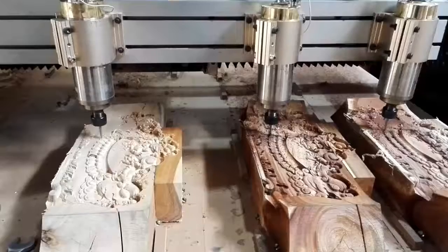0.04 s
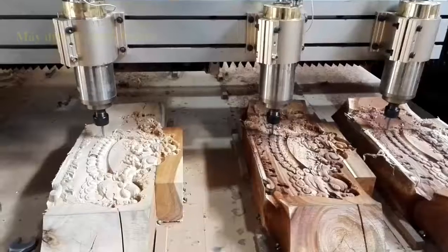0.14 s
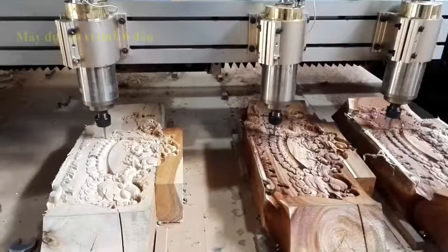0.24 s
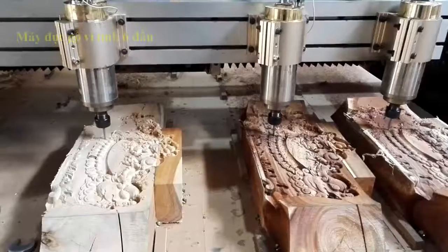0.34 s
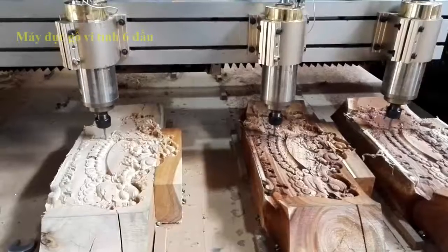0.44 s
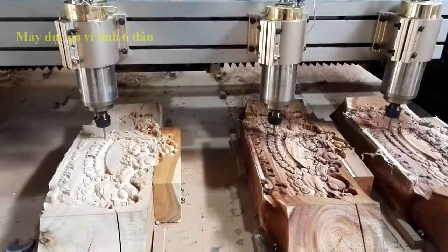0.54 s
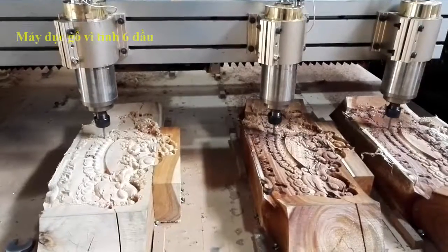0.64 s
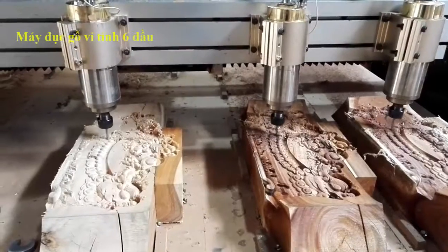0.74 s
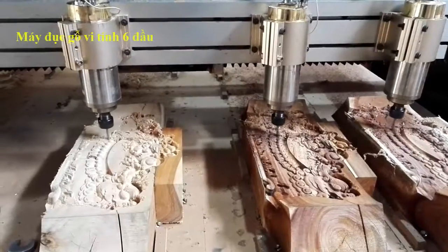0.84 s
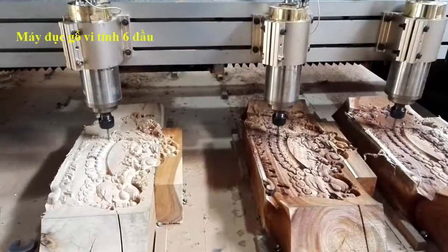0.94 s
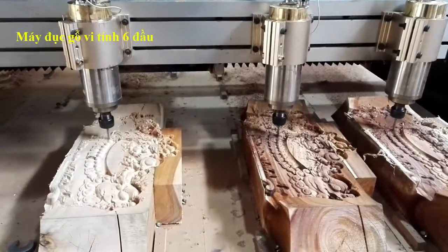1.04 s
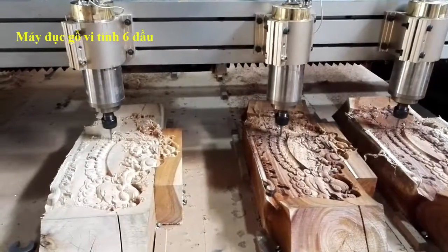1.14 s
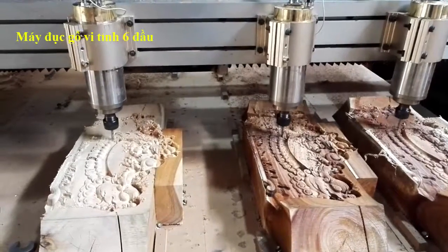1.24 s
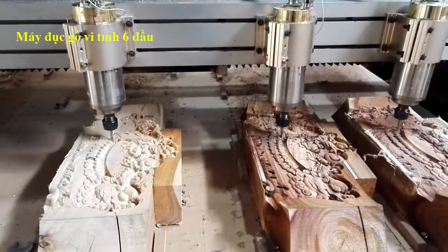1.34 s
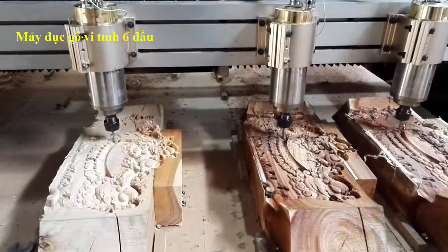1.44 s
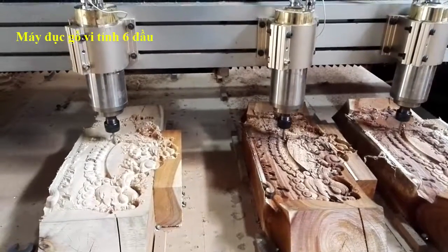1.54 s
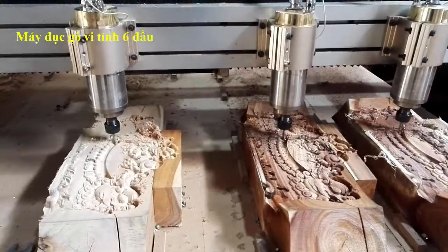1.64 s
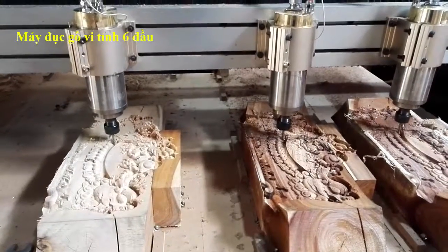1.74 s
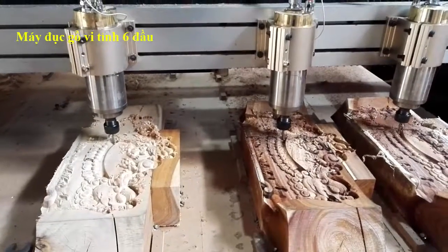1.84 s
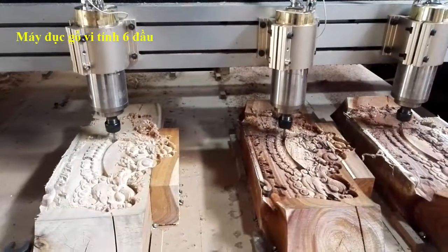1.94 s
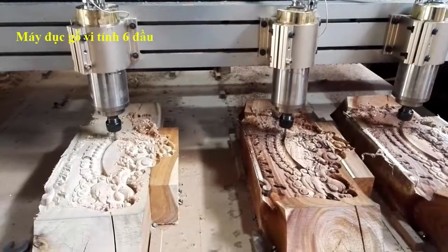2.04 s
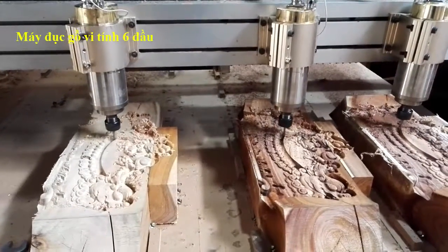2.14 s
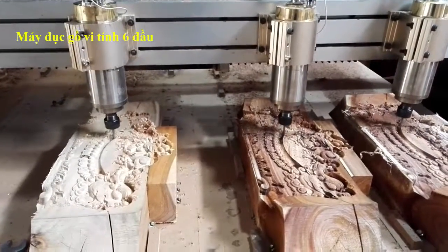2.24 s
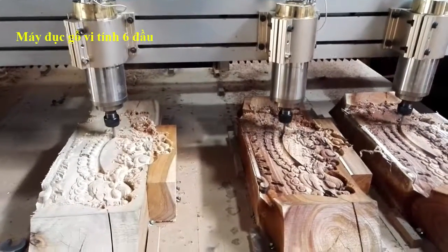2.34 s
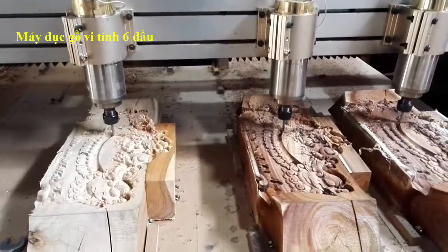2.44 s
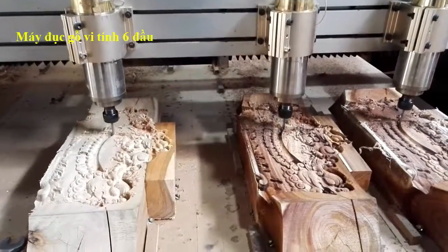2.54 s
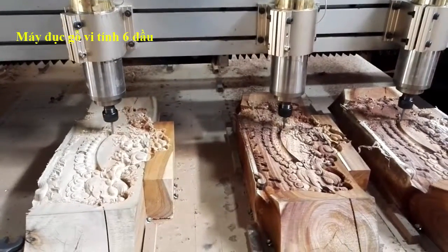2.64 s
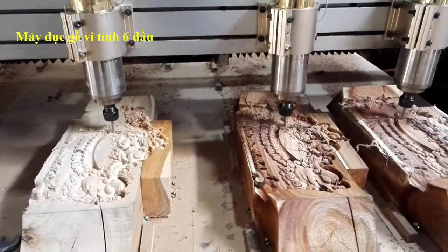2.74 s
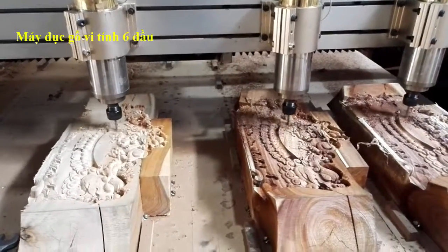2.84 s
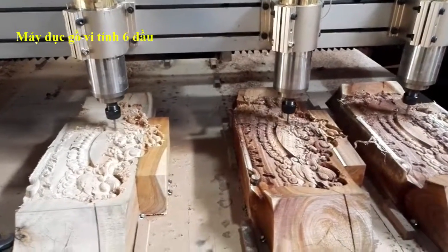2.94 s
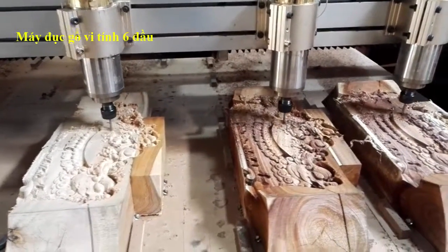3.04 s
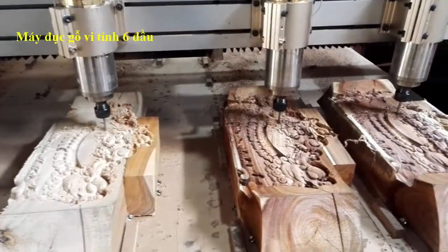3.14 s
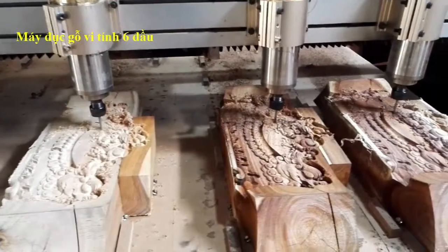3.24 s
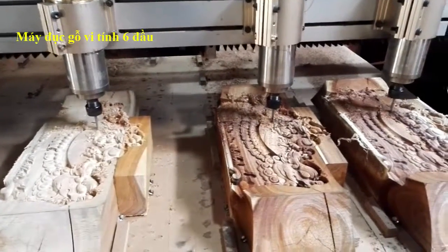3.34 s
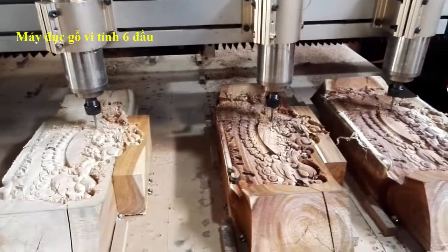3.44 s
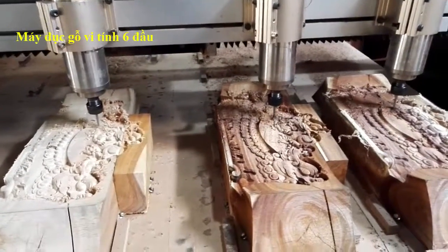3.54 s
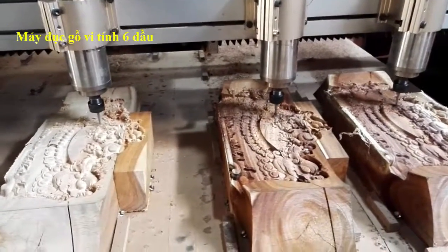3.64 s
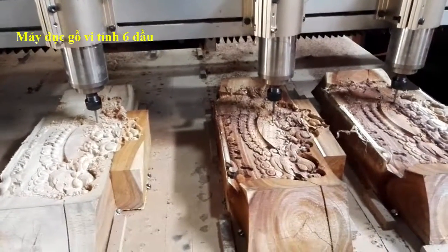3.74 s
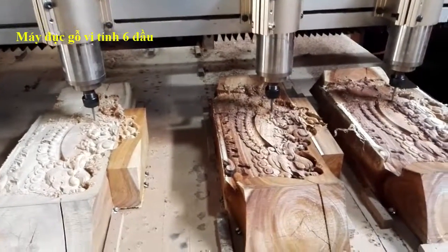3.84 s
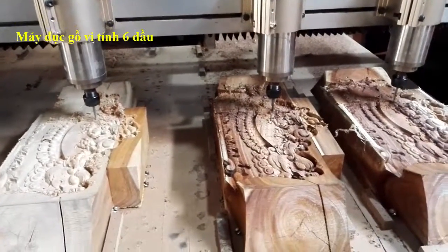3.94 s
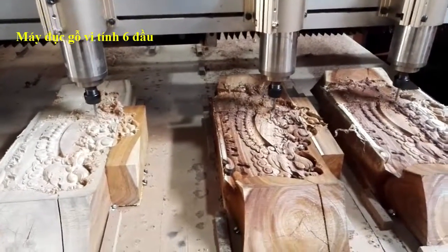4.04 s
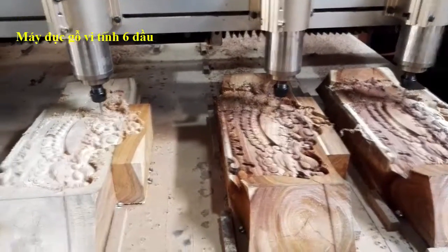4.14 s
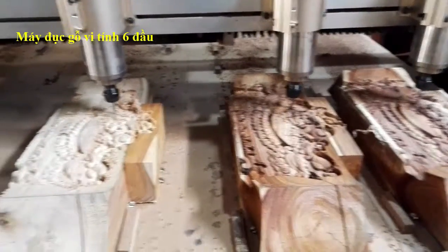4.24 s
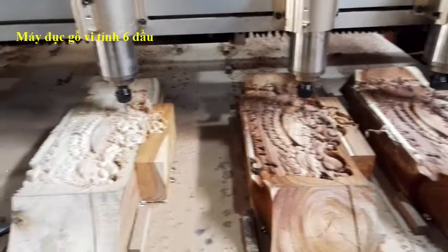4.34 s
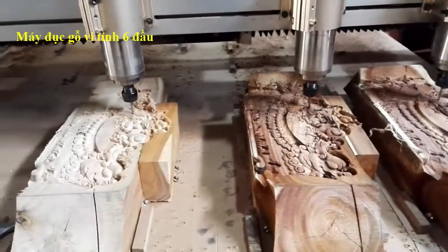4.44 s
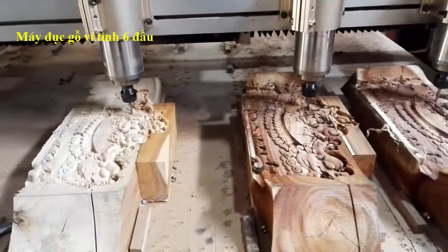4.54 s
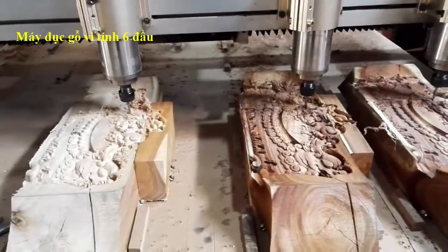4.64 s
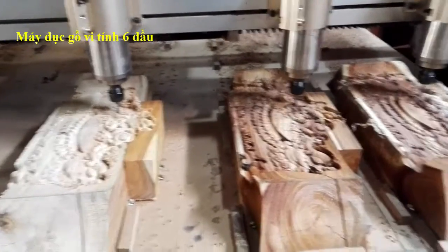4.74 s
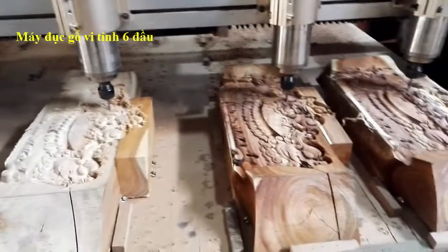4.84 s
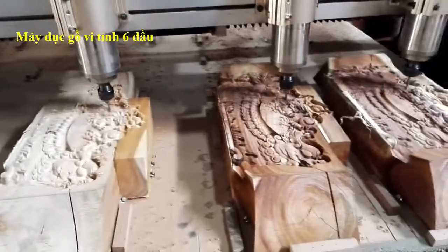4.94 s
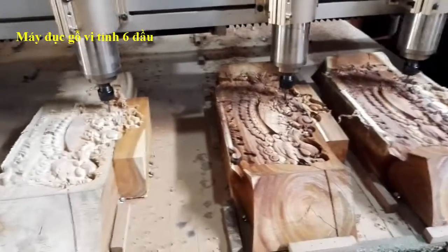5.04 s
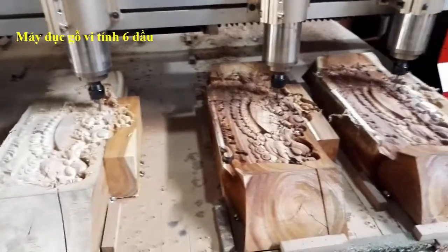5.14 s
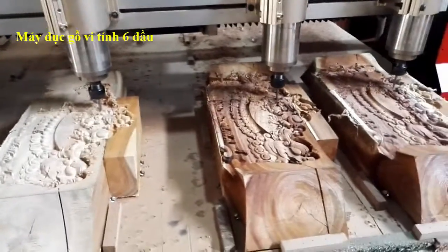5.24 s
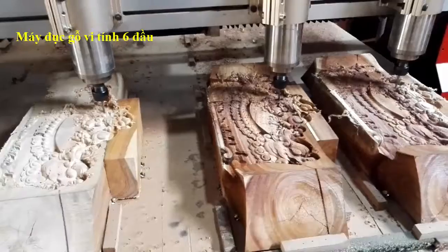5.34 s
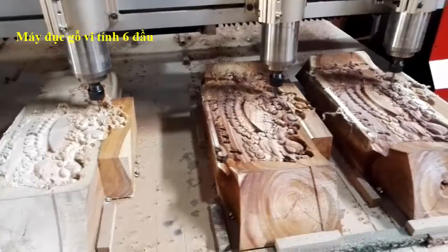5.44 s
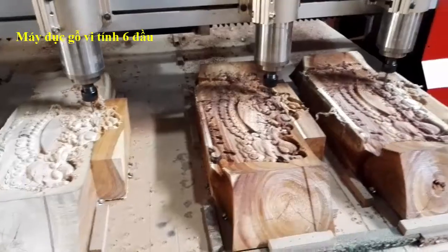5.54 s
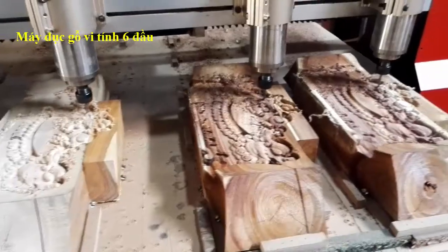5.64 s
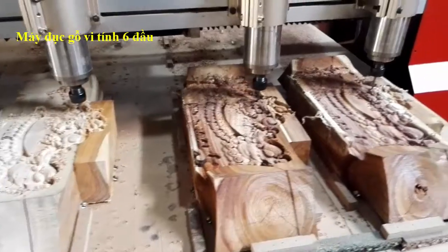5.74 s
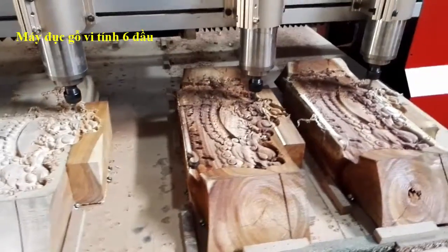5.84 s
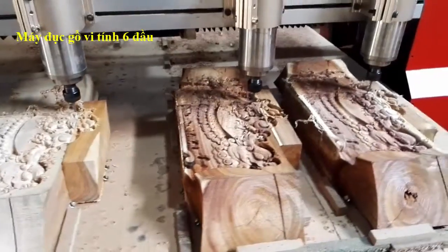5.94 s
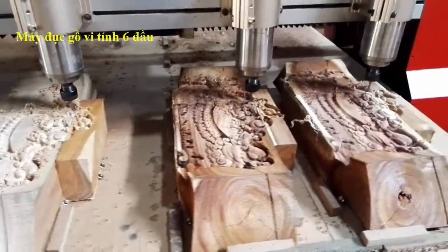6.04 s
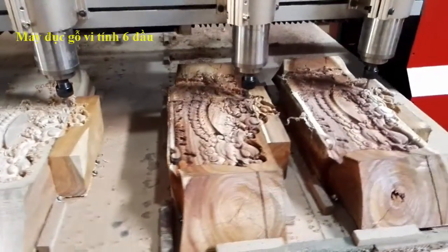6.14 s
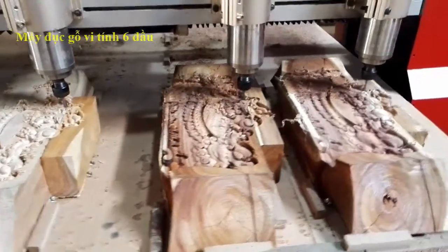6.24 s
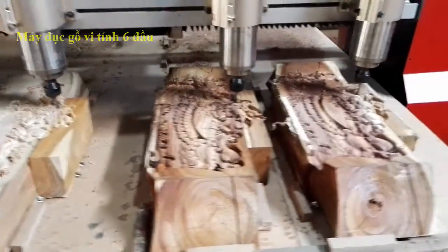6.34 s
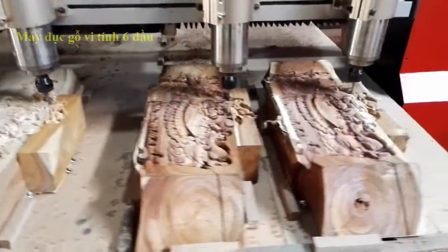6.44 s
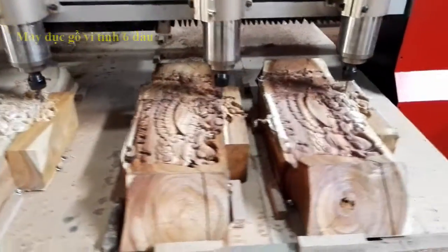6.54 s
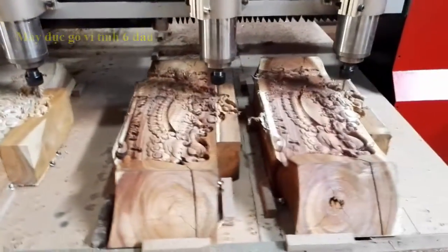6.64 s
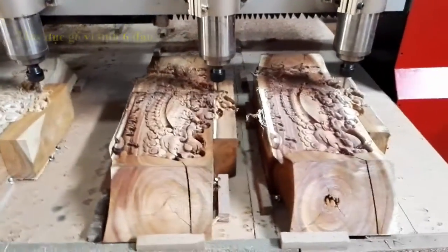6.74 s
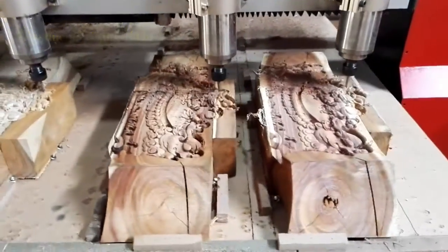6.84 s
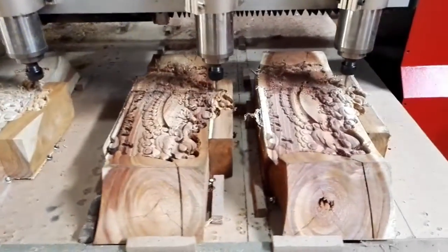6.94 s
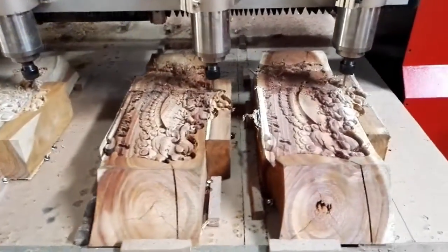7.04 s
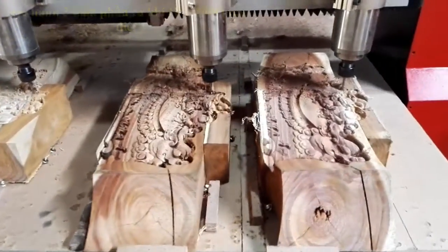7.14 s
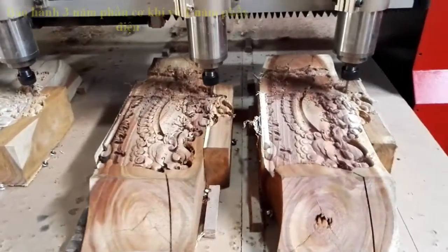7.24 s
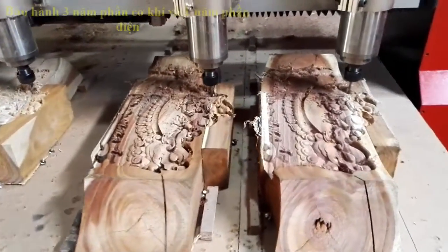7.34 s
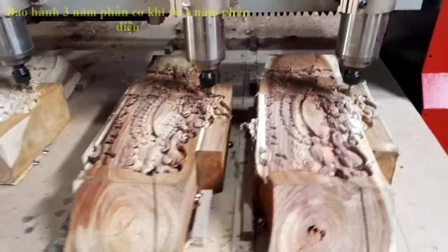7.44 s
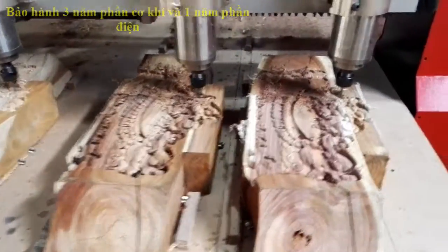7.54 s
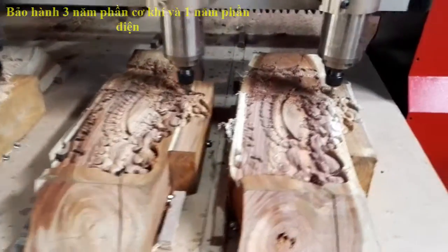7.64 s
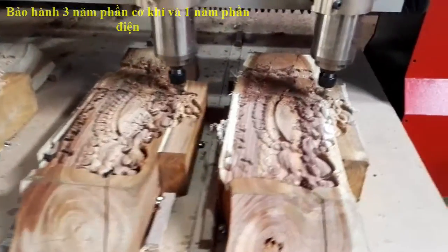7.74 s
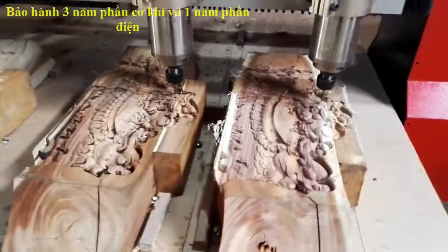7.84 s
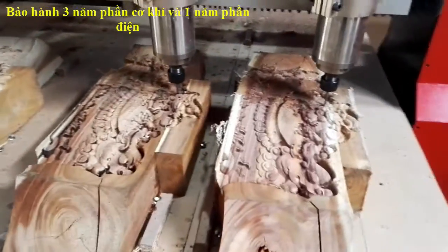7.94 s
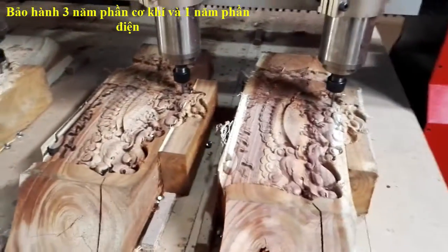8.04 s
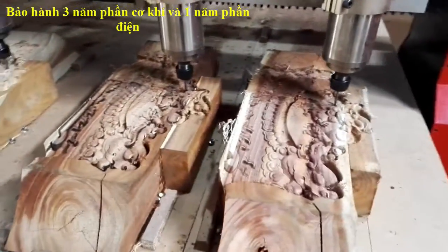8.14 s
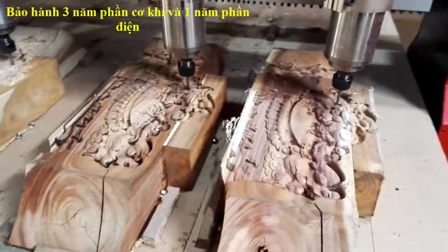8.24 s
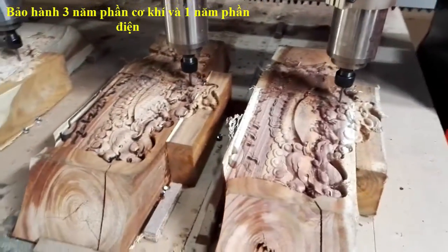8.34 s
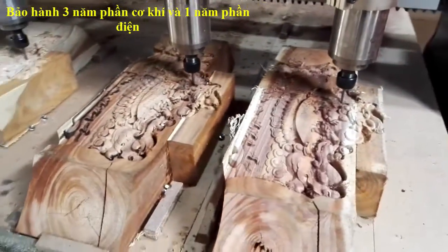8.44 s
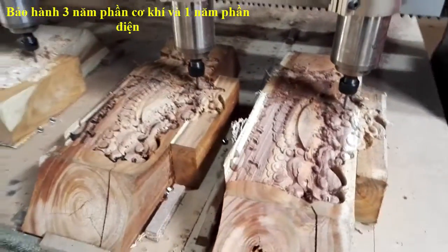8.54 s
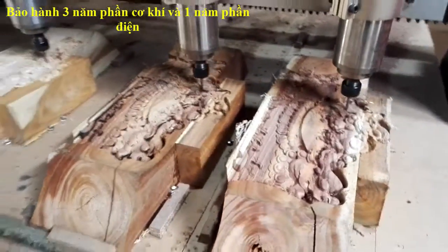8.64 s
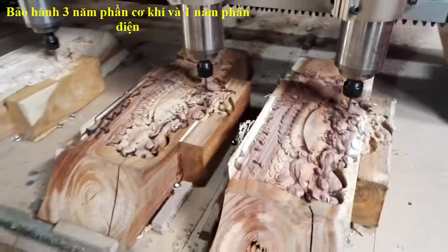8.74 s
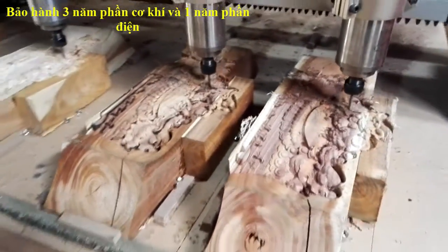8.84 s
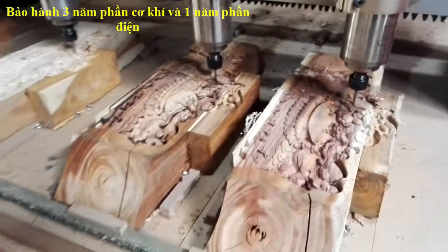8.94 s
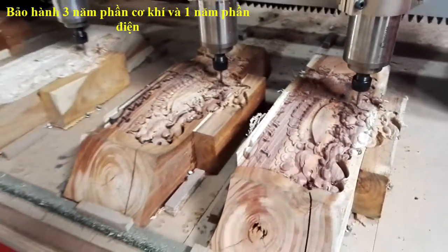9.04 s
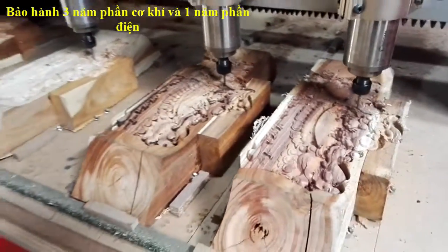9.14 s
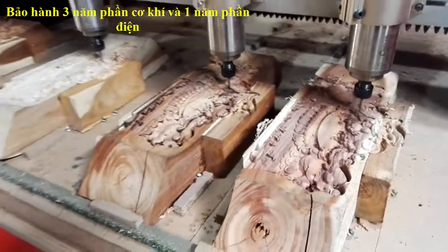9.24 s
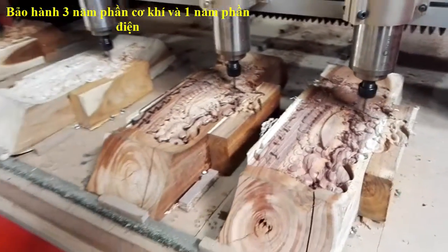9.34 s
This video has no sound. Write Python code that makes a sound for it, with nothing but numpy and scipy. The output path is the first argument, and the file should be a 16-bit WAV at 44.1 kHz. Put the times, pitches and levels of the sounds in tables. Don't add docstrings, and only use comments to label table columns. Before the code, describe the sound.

After a tiny silence, the whine of several wood-carving spindles fades in over about 0.3 seconds, close to a handheld stereo microphone in a workshop. The pitch stays nearly fixed, a 400 hertz hum with a strong tone an octave above and many buzzing overtones, beating as the motors drift in and out of step. Cutter bites swell every few tenths of a second with gritty buzz and chip hiss. Near 2.5 seconds one very short block leaps loud and distorted, then the level drops slightly. A strong swell follows around 2.9. The whine dips near 4.3, skips minutely at 5.4, and wavers with several hollow dips from 6.6 to 8.1. A thin, very high squeal joins around 8, with another strong swell near 8.7. Low gantry rumble and faint motor whistles persist until the end at about 9.4 seconds, with the machine still running.

```python
import sys
import numpy as np
from scipy import signal
from scipy.io import wavfile
from scipy.ndimage import uniform_filter1d

SR = 44100
rng = np.random.default_rng(int(sys.argv[2]) if len(sys.argv) > 2 else 0)


def invert_db(x):
    u = np.asarray(x, float) / 20
    return 10 ** u


def wav_out(sig):
    wavfile.write(sys.argv[1], SR, np.round(np.clip(np.atleast_2d(sig).T, -1, 1) * 32767).astype(np.int16))


N = 413658


def rms_one(x):
    return x / np.sqrt(np.mean(np.abs(x) ** 2) + 1e-20)


def left_right(mid, side):
    return np.array([mid + side, mid - side])


def in_time(points):
    s, value = np.transpose(points)
    return np.interp(np.arange(N) / SR, s, value)


def at_hz(points, hz):
    point_hz, value = np.transpose(points)
    return np.interp(np.log(hz), np.log(point_hz), value)


def drift(rate):
    r = np.exp(-80 * np.pi * rate / SR)
    steps = rng.standard_normal(N // 40 + 4002)
    slow = signal.lfilter([1], [1, -2 * r, r * r], steps)[4000:]
    return np.interp(np.arange(N) / 40, np.arange(len(slow)), rms_one(slow))


def fading(rate):
    return (drift(rate) + 1j * drift(rate)) / np.sqrt(2)


def on_top(load_db, idle):
    return np.sqrt(invert_db(2 * load_db) + idle ** 2)


def swells(rows, order):
    rows, t = np.array(rows), np.arange(0, N + 64, 64) / SR
    centre, length = rows[:, :1], rows[:, 1:2]
    humps = np.cos(np.pi * np.clip((t - centre) / length, -.5, .5)).clip(0) ** order
    return [np.interp(np.arange(N) / SR, t, c) for c in invert_db(rows[:, 2:]).T @ humps]


def cave_in(rows, length_s):
    dips = [(s, length_s, 20 * np.log10(depth_db)) for s, depth_db in rows]
    return invert_db(-swells(dips, order=2)[0])


# (frequency [Hz], likeness [-1 to 1])
LIKENESS = [(25, .96), (130, .95), (290, .85), (640, .5), (1400, -.1), (3000, .15), (7000, -.05),
            (15000, -.05)]


def banded_noise(spectrum, low_hz, count, patchiness):
    out = np.zeros((2, N), np.float32)
    edges = low_hz * 2 ** (np.arange(count + 1) / 3)
    white = rng.standard_normal((2, 2, N))
    for k, (low, high) in enumerate(zip(edges, edges[1:])):
        band_pass = signal.butter(2, [low, high], "band", fs=SR, output="sos")
        band = signal.sosfilt(band_pass, white[k % 2])
        hz = np.sqrt(low * high)
        alike = np.clip(at_hz(LIKENESS, hz), -1, 1)
        flicker = 2 + patchiness / 4 * drift(5.9)
        out += invert_db(at_hz(spectrum, hz)) * flicker * band * np.sqrt([[1 + alike], [1 - alike]])
    return left_right(*(out / np.std(out[0])))


# (time [s], level [dB])
GAIN = [
    (.053, -16.5),
    (.1, -9),
    (.17, -1.5),
    (.3, 4),
    (2.47, 6.5),
    (2.5, 1.07),
    (9.38, 3),
]


def recorder_gain():
    return invert_db(in_time(GAIN))


# (frequency [Hz], level [dB per Hz])
RUMBLE = [(25, -23), (50, -9.5), (85, -4), (120, -1.6), (200, -15), (270, -12.5), (400, -4), (500, -12.5),
          (640, -3), (950, -7.5), (1400, -10.5), (1900, -15), (2600, -12.5)]


def gantry_rumble(bed):
    return bed * invert_db(-39) * banded_noise(RUMBLE, low_hz=25.3, count=20, patchiness=1.73)


# (frequency [Hz], level [dB])
MOTOR_LINES = [
    (270.1, -51.5),
    (283.4, -55),
    (5399, -55),
    (8700, -57),
    (10200, -60),
    (578, -56.5),
    (2471, -59),
    (4600, -60),
]
# (time [s], level [dB])
WHISTLE = [(.3, -47), (2.1, -45), (2.7, -55), (3.9, -53), (4.35, -44), (6.2, -48), (6.35, -42), (7.6, -43),
           (7.9, -46), (8.5, -40), (9, -47), (9.38, -56)]
WHISTLE_HZ = 12591


def motors(bed):
    t, mid, side = np.arange(N) / SR, 0, 0
    whistle_db = in_time(WHISTLE) + np.minimum(20 * np.log10(bed), 0)
    lines = [(WHISTLE_HZ, on_top(whistle_db, bed * invert_db(-69)))]
    nearness = invert_db(np.interp(t, [6.2, 6.9], [0, -3.5]))
    lines += [(hz, nearness * bed * invert_db(level_db)) for hz, level_db in MOTOR_LINES]
    squeal = invert_db(-43) * np.interp(t, [7.9, 8.3], [.15, 1]) * (0.46 + 1.1 * fading(90))
    lines += [(11220, squeal)]
    for hz, level in lines:
        tone = np.sqrt(2) * level * np.exp(1j * (2 * np.pi * hz * t + 0.65 * drift(3.5)))
        unlike = np.sqrt(1 - np.clip(at_hz(LIKENESS, hz), -1, 1))
        mid = mid + tone.real
        side = side + np.real(tone * fading(3.9)) * unlike
    return left_right(mid, side) * invert_db([[3.5], [-3.5]])


# (frequency [Hz], level [dB per Hz])
HISS = [(2500, -12), (3000, -8), (3500, -12), (4200, -8.5), (5000, -10.5), (6200, -6.5), (11000, -2),
        (15500, -6)]
RIGHT_LAG_S = [.00039, .00036, -.0001]


def chips(mid_db, high_db, strokes, bed):
    puffs = rms_one(1 + 0.067 * strokes.sum(axis=0))
    load_db = 0.36 * mid_db + 0.64 * high_db - 2.5
    left, right = banded_noise(HISS, low_hz=2430, count=8, patchiness=1.45)
    right = .96 * right + .25 * np.roll(right, round(RIGHT_LAG_S[0] * SR))
    return on_top(load_db, bed * invert_db(-36)) * puffs * np.array([left, right])


# (centre [s], length [s], edge buzz [dB], chip spray [dB])
BITES = [(0.56, 1.0, -39, -39.5), (0.92, 0.36, -44.5, -47), (1.36, 0.47, -42.0, -40.0),
         (1.68, 0.52, -44, -42), (1.85, 0.23, -36.0, -35.0), (1.93, 0.15, -51, -26.5),
         (2.08, 0.17, -37.5, -31), (2.19, 0.35, -39.0, -46), (2.92, 0.42, -34.0, -36.0),
         (3.12, 0.53, -37.5, -46), (3.66, 0.67, -41.5, -35.0), (4.07, 0.31, -37.5, -38.0),
         (4.38, 0.5, -46, -35.5), (4.49, 0.2, -40.0, -29.5), (4.87, 0.99, -38.5, -36.5),
         (5.35, 0.39, -37.5, -43), (5.66, 0.51, -35, -43), (5.94, 0.091, -42, -54),
         (6.16, 0.31, -32.5, -41), (6.36, 0.3, -55, -59), (6.77, 0.57, -33, -37.5),
         (7.13, 0.33, -60.0, -55), (7.59, 0.76, -42.5, -44), (8.04, 0.33, -57, -45),
         (8.35, 0.46, -40.5, -48), (8.67, 0.65, -57, -38), (8.72, 0.2, -45.0, -41), (9.11, 0.77, -46, -41)]
# edge buzz, chip spray, each a level [dB]
SKIM_DB = [-44.5, -52.5]


def bites():
    return swells(BITES, order=2) + invert_db(SKIM_DB)[:, None]


# (centre [s], length [s], order 4 [dB], order 5 [dB])
SHUDDERS = [(0.31, 0.53, -38.0, -42.5), (0.51, 0.14, -36, -38), (0.7, 0.29, -41.0, -43),
            (0.91, 0.099, -40.0, -41), (1.04, 0.76, -40.0, -42), (1.34, 0.35, -38, -62.0),
            (1.66, 0.31, -42.5, -42.0), (1.96, 0.4, -34.5, -50), (2.13, 0.16, -36.5, -38),
            (2.41, 0.36, -38.5, -43), (2.98, 0.75, -35.0, -38.5), (3.39, 0.18, -38.5, -59.0),
            (3.97, 0.75, -46.5, -42), (4.31, 0.22, -43.0, -48.0), (4.56, 0.45, -44, -58.0),
            (5.0, 0.16, -39, -40.5), (5.21, 0.13, -48, -44), (5.5, 0.8, -44, -49), (6.16, 0.27, -35.5, -38),
            (6.38, 0.29, -50, -44.0), (6.67, 0.31, -62.0, -38), (6.89, 0.74, -41.5, -37.5),
            (7.51, 0.38, -39.5, -38.5), (7.98, 0.66, -44, -42), (8.21, 0.18, -65, -40),
            (8.42, 0.13, -42.0, -40), (8.7, 0.27, -39.5, -36.5), (9.18, 0.88, -47.0, -39)]


def frame_shudder():
    return swells(SHUDDERS, order=1)


# (centre [s], length [s], level [dB])
IN_STEP = [(0.53, 1.36, -31.5), (1.3, 0.45, -31.5), (1.77, 0.65, -30), (2.12, 0.15, -35.0),
           (2.32, 0.08, -43.0), (2.54, 0.23, -37), (2.83, 0.44, -36.0), (3.0, 0.21, -33.5),
           (3.23, 0.26, -33), (3.58, 0.48, -36.5), (4.3, 0.58, -36.5), (4.65, 0.18, -34),
           (4.92, 0.52, -36.5), (5.49, 0.72, -36.5), (6.02, 0.3, -35), (6.39, 0.34, -37.5),
           (6.78, 0.41, -32), (7.1, 0.36, -37.5), (7.38, 0.24, -35.5), (7.62, 0.22, -34.5),
           (7.82, 0.28, -34), (8.27, 0.53, -40.0), (8.8, 0.71, -34.5), (9.22, 0.34, -39)]


def block_ring():
    return swells(IN_STEP, order=1)[0]


# (time [s], level [dB])
UNBALANCE = [(.08, -19), (1.78, -22.5), (2.2, -29.5), (2.52, -26.5), (2.66, -25.5), (3.2, -28.5),
             (3.42, -24), (3.68, -37), (3.92, -29), (4.4, -39.5), (4.56, -28.5), (4.86, -35), (5.22, -24.5),
             (5.3, -28.5), (6.08, -28), (7.3, -31.5), (8.75, -28), (9.37, -28)]
# (time [s], depth [dB])
CANCELS = [
    (4.27, 14),
    (6.6, 6),
    (6.98, 10),
    (7.11, 10),
    (7.44, 10),
    (7.71, 5),
    (8.06, 5),
]


def shaft_unbalance():
    return invert_db(in_time(UNBALANCE)) * cave_in(CANCELS, length_s=0.17)


# (centre [s], length [s], order 2 [dB], order 6 [dB])
PASSES = [(0.19, 0.31, -24.5, -37.5), (0.47, 0.37, -27, -43), (0.74, 0.3, -25, -67),
          (0.94, 0.19, -33, -41.0), (1.11, 0.36, -24.5, -44.5), (1.5, 0.66, -26.5, -40.5),
          (1.83, 0.24, -31, -35), (2.2, 0.64, -27.0, -34.5), (2.56, 0.45, -24.0, -39.5),
          (2.92, 0.46, -20.0, -27.5), (3.31, 0.36, -24.5, -44), (3.64, 0.29, -23.0, -36),
          (4.04, 0.46, -32.0, -44.5), (4.46, 0.68, -28, -44), (4.96, 0.49, -23, -32.5),
          (5.35, 0.34, -25.0, -36.5), (5.63, 0.31, -23.0, -36), (5.8, 0.18, -23.0, -43),
          (5.94, 0.19, -32.5, -37), (6.26, 0.63, -24.5, -44.5), (6.76, 0.54, -24.5, -33),
          (7.05, 0.34, -37.5, -35.5), (7.37, 0.53, -30.0, -40.5), (7.57, 0.38, -23.5, -44),
          (7.97, 0.59, -30.0, -36.5), (8.29, 0.4, -28, -35.5), (8.51, 0.17, -22.5, -32),
          (8.73, 0.37, -20.0, -30.5), (9.12, 0.42, -22.0, -47)]
# (centre [s], length [s], order 2 [dB], order 6 [dB])
JERK = [
    (2.12, 0.064, -21.5, -38),
]
# (time [s], depth [dB])
FLUTE_CANCELS = [(1.75, 15), (2.06, 3), (2.2, 13), (3.52, 12), (4.27, 10), (4.55, 12), (4.72, 12),
                 (6.87, 4), (7.11, 8), (7.76, 9), (8.12, 6)]


def cutter_passes():
    second, sixth = swells(list(PASSES) + JERK, order=1)
    return second * cave_in(FLUTE_CANCELS, length_s=0.066), sixth


TURN_HZ = 399.4
SKIP_S, SKIP_TURNS = 5.36, .29


def rotation(hz, wobble):
    t = np.arange(N) / SR
    return 2 * np.pi * (hz * t + SKIP_TURNS * (t > SKIP_S)) + wobble * drift(2.38)


# (multiple of the turn, level [dB])
BUZZ = [(7, -21.5), (8, -25.5), (9, -22.5), (10, -20), (11, -21.5), (12, -21.5), (13, -22.5), (14, -22.5),
        (15, -24.5), (16, -21.5), (17, -25), (18, -14.5), (19, -27.5), (20, -48), (21, -42), (22, -17.5),
        (23, -13.5), (24, -13), (25, -19.5), (26, -14), (27, -25), (28, -14.5), (29, -24), (30, -38),
        (31, -16), (32, -29), (33, -31), (34, -31), (35, -47), (36, -36)]
SPEED_OFFSETS_HZ = [-.4, 0.0477, .25]
GRAIN, GRAIN_HZ = .35, 45


def edge_buzz(mid_level, high_level):
    angles = np.array([rotation(TURN_HZ + d, wobble=0.1) for d in SPEED_OFFSETS_HZ])
    turn = np.exp(1j * angles).astype(np.complex64)
    uneven = invert_db(4 * np.array([drift(13.5) for _ in SPEED_OFFSETS_HZ])).astype(np.float32)
    jolts = 1 + GRAIN * np.array([fading(GRAIN_HZ) for _ in SPEED_OFFSETS_HZ])
    power = turn ** 6 * uneven * jolts.astype(np.complex64)
    layers = np.zeros((2, 2, N), np.float32)
    for k, level_db in BUZZ:
        power = power * turn
        lag = np.tan(np.pi * k * TURN_HZ * np.array(RIGHT_LAG_S))
        apart = 1j * np.clip(lag, -1.1, 1.1) + 0.52 * rng.standard_normal(3)
        phases = np.exp(2j * np.pi * rng.random(3))
        paths = invert_db(level_db) * phases * np.array([np.ones(3), apart])
        layers[int(k > 17)] += (paths.astype(np.complex64) @ power).real
    mid_buzz = invert_db(-1.5) * mid_level * rms_one(layers[0])
    high_buzz = invert_db(-4) * high_level * rms_one(layers[1])
    return left_right(*(mid_buzz + high_buzz)), turn.real


SIDE_DB = [-29, -4.5, -2, 3.5, 1, -1.5]
LEFT_LEAD = [.18, .17, .6, -.8, .3, -.25]
# (depth, side-band offset [Hz])
CHATTER = [(0.15, 26), (0.15, -22), (0.28, 1), (0.45, 1.5), (0.26, -1.5), (0.18, -2.5)]


def whine(levels):
    t, mid, side = np.arange(N) / SR, 0, 0
    angle = rotation(TURN_HZ, wobble=0.43)
    orders = zip(levels, SIDE_DB, LEFT_LEAD, CHATTER)
    for k, (level, side_db, lead, (depth, off_hz)) in enumerate(orders, 1):
        phase = k * angle + 0.46 * drift(3.5) + rng.uniform(0, 2 * np.pi)
        tone = np.sqrt(2) * np.exp(1j * phase)
        broad = uniform_filter1d(level, size=6000)
        shake = depth * fading(9 + 3.2 * k) * np.exp(2j * np.pi * off_hz * t)
        sway = invert_db(1.2 * drift(14.5))
        mid = mid + np.real(tone * (level * sway + broad * shake))
        wander = .4 * drift(2.58) + .9j * drift(2.58)
        side = side + np.real(tone * (broad * invert_db(side_db) * wander + 1j * lead * level))
    return left_right(mid, side)


# one level [dB] each for orders 1-6, mid buzz and high buzz
IDLE_DB = [-73, -46.5, -50, -49, -47.5, -56, -43.5, -53.5]


def scene():
    bed = recorder_gain()
    second, sixth = cutter_passes()
    fourth, fifth = frame_shudder()
    edge, spray = bites()
    loads = [shaft_unbalance(), second, block_ring(), fourth, fifth, sixth, edge, spray]
    loads_db = [20 * np.log10(bed * load + 1e-4) for load in loads]
    levels = [on_top(load_db, bed * invert_db(idle_db)) for load_db, idle_db in zip(loads_db, IDLE_DB)]
    buzz, strokes = edge_buzz(*levels[6:])
    background = gantry_rumble(bed) + motors(bed)
    return background + chips(*loads_db[6:], strokes, bed) + buzz + whine(levels[:6])


def roll_off(x):
    return signal.sosfilt(signal.butter(12, 15520, fs=SR, output="sos"), x)


START_S = .053
# from [s], to [s], gain leap [dB]
JUMP = (2.4755, 2.4965, 11.7)


def record(dry):
    t = np.arange(N) / SR
    start, end, jump_db = JUMP
    leap = np.interp(t, [start - .0005, start, end, end + .0005], [0, 1, 1, 0])
    fade_in = np.clip((t - START_S) / 0.0032, 0, 1)
    gain = invert_db(jump_db * leap) * fade_in * invert_db([[.2], [-.2]])
    low_pass = signal.ellip(8, .3, 40, 14100, fs=SR, output="sos")
    dull = signal.sosfiltfilt(low_pass, dry)
    heard = dull + invert_db(-6.5 + 2.4 * drift(15)) * (dry - dull)
    return roll_off(np.clip(heard * gain, -1, 1))


dry = scene()
out = record(dry)
wav_out(out)
```